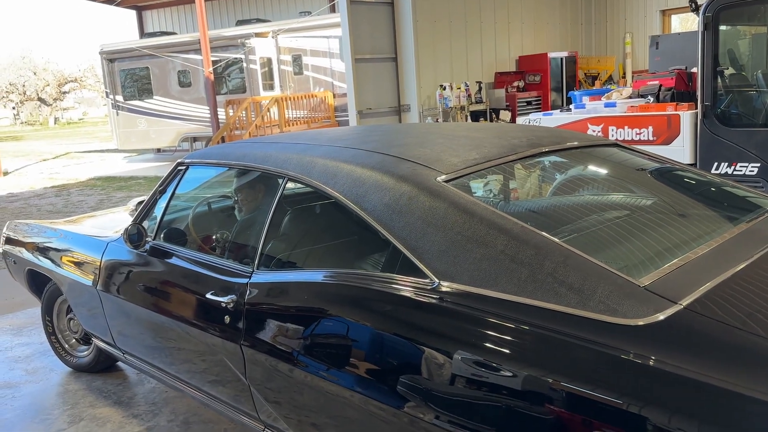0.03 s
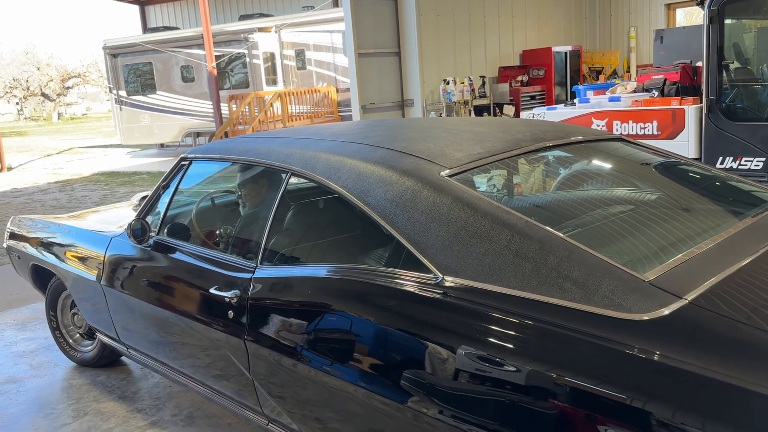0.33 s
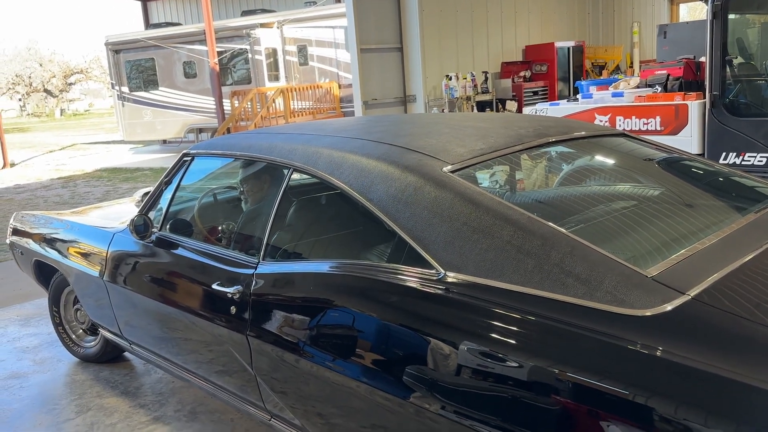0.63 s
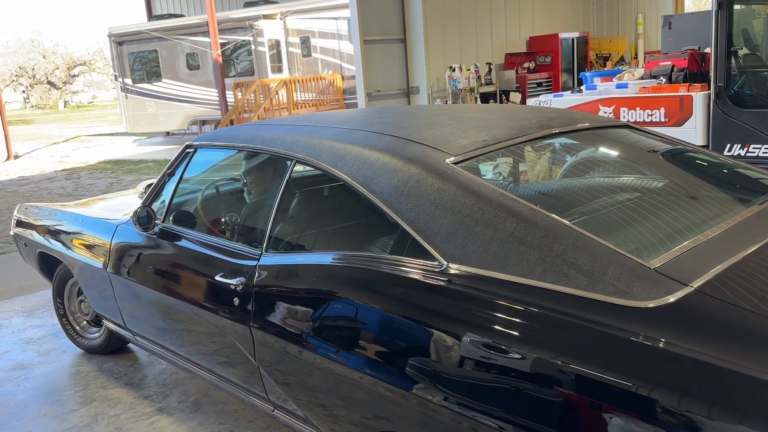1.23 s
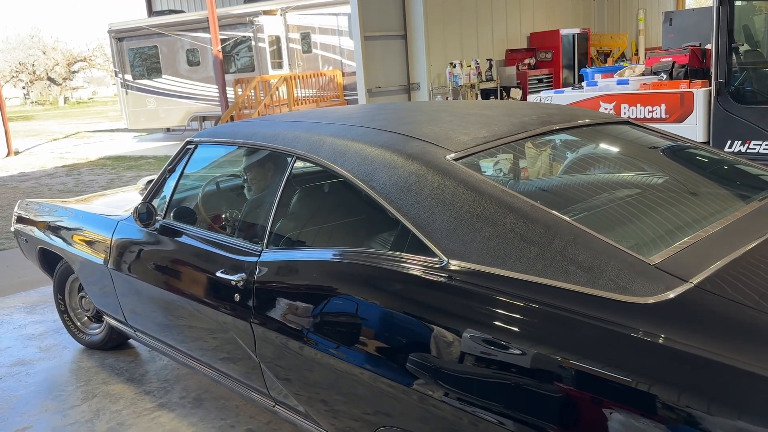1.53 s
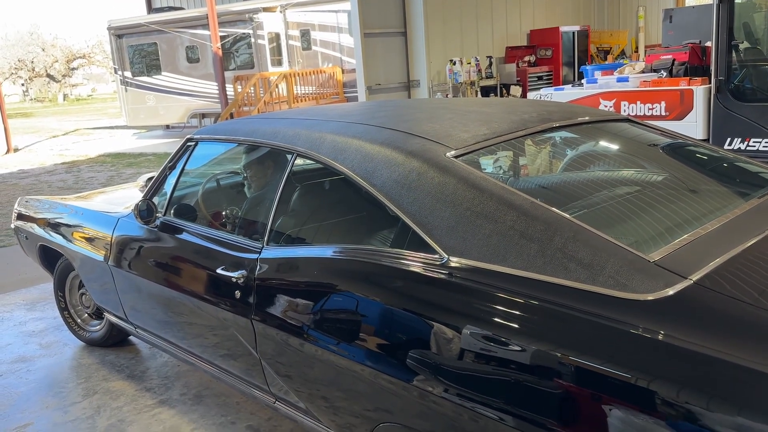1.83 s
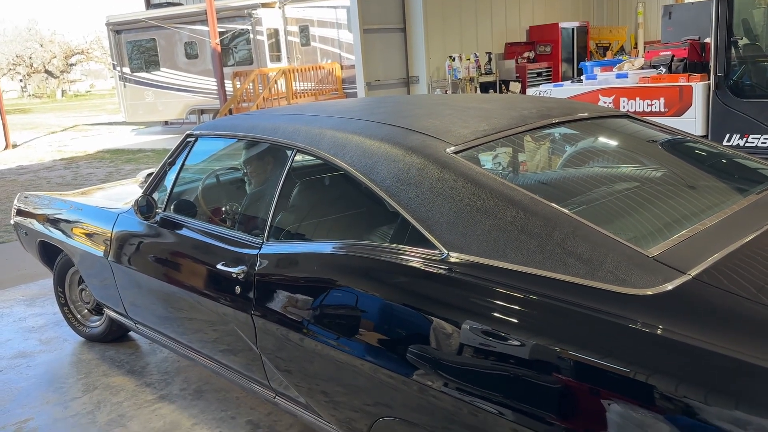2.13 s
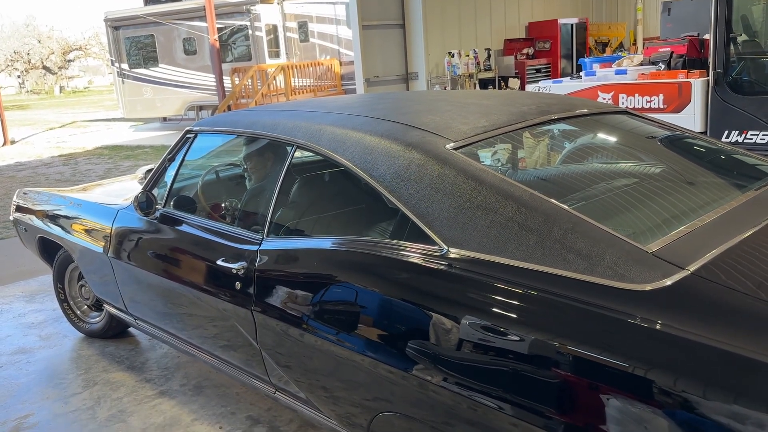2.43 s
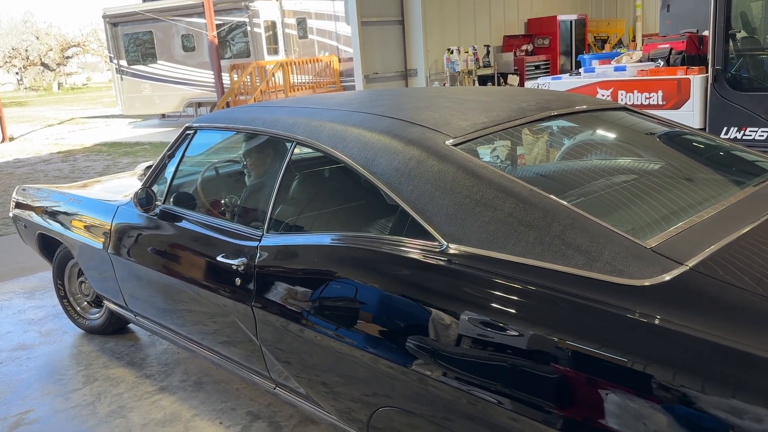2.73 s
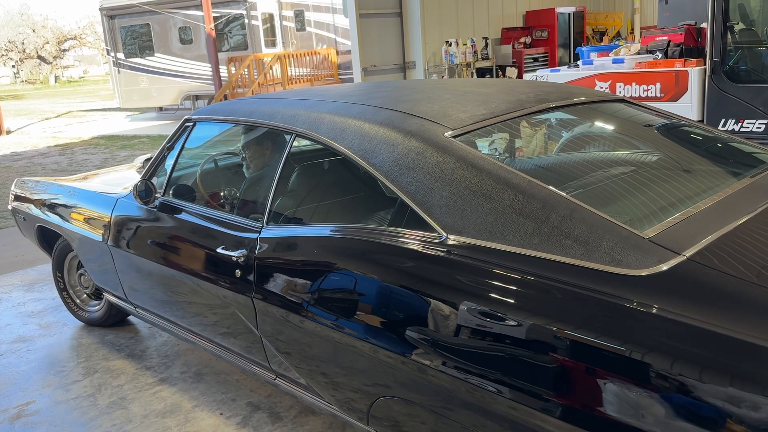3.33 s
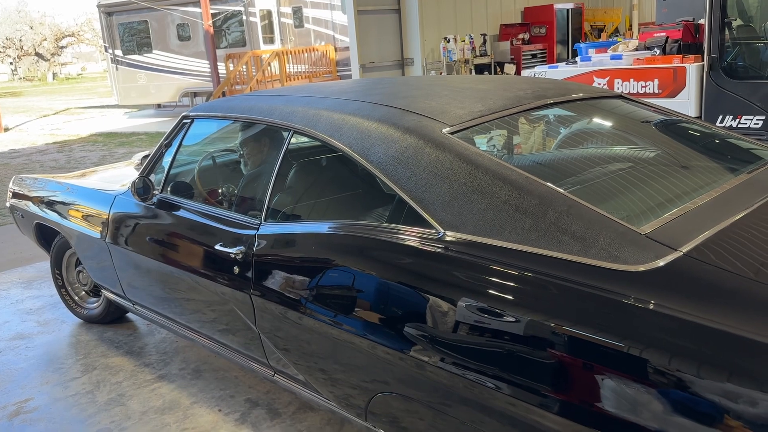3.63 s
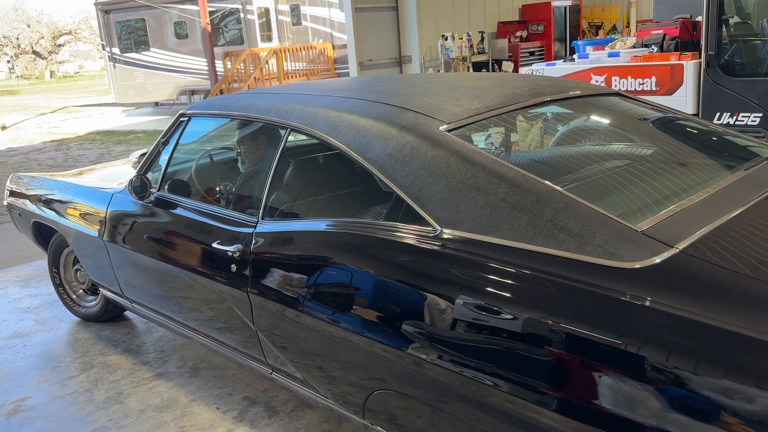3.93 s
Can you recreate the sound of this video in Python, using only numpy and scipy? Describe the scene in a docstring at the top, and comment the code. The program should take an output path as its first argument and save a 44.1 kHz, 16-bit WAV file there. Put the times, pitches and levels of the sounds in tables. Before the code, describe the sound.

A car engine cold-starts nearby after a moment of quiet garage background. A short squeak and starter clack lead to a loud exhaust boom and a few spits, easing into a throbbing, ticking idle with short wall reflections.

```python
"""Cold start of a V8 in a garage

The starter clacks in; the engine catches, stumbles, booms and settles into a loping idle.
Each firing sends a pressure pulse down the exhaust of its cylinder bank and excites the pipe modes;
at idle, alternate cycles differ in strength, which makes the lope. Fan and intake rush in time with
the firings, one bank ticks sharply, and the walls reflect the sound."""
import sys
import numpy as np
from scipy import signal
from scipy.io import wavfile

SR = 44100
rng = np.random.default_rng(int(sys.argv[2]) if len(sys.argv) > 2 else 0)


def pcm_store(signal):
    """Save signal as 16-bit PCM."""
    levels = np.round(np.clip(np.atleast_2d(signal), -1, 1) * 32767)
    wavfile.write(sys.argv[1], SR, levels.astype(np.int16).T)


N = 176400
TIME = np.arange(N) / SR
SIDES = np.array([[1], [-1]])  # sign of the left and right channel


def amp(db):
    """Amplitude ratio of a level in decibels."""
    return 10 ** (np.asarray(db) / 20)


def curve(rows, t=TIME):
    """Linear interpolation between breakpoints in time."""
    return np.interp(t, *np.transpose(rows))


def at_hz(rows, hz):
    """Interpolation of a spectrum on a logarithmic frequency axis."""
    f, value = np.transpose(rows)
    return np.interp(np.log(hz), np.log(f), value)


def resonate(x, hz, width):
    """Damped resonator with unit peak gain and a bandwidth in Hz."""
    r = np.exp(-np.pi * width / SR)
    feedback = [1, -2 * r * np.cos(2 * np.pi * hz / SR), r * r]
    return signal.lfilter(np.array([1, 0, -1]) * (1 - r * r) / 2, feedback, x + 1e-18)


def butterworth(x, hz, kind="low", order=2):
    """Filter with a maximally flat passband."""
    return signal.sosfilt(signal.butter(order, hz, kind, fs=SR, output="sos"), x)


def impulses(times, gain):
    """Weighted impulse train."""
    return np.bincount((times * SR).astype(int), gain, N)[:N]


def bursts(times, gain, decay_s):
    """Exponential relaxation: an envelope that jumps at each time and dies away."""
    kicks = impulses(np.atleast_1d(times), np.atleast_1d(gain))
    return signal.lfilter([1], [1, -np.exp(-1 / (decay_s * SR))], kicks + 1e-18)


# Likeness of left and right: f/Hz, correlation (limited to 1 in use)
COHERENCE = [(60, 2.5), (250, 0.83), (500, .5), (1000, 0.1), (2000, 0.26), (4000, 0.42), (8000, 0.3),
             (14000, 0)]
# Left minus right: f/Hz, level/dB
BALANCE = [(250, 1), (1000, -1), (2000, -2.5), (4400, 4), (7500, 5.5), (14000, -2)]


def noise(spectrum, low_hz, high_hz):
    """Partially coherent stereo noise, summed in third-octave bands to unit rms."""
    out, white = 0, rng.standard_normal((2, 2, N))
    edges = 28 * 2 ** (np.arange(29) / 3)
    for k, band in enumerate(zip(edges, edges[1:])):
        hz = np.sqrt(np.prod(band))
        if low_hz < hz < high_hz:
            mid, side = butterworth(white[k % 2], band, "band")
            alike = np.clip(at_hz(COHERENCE, hz), -1, 1)
            gain = amp(at_hz(spectrum, hz) + SIDES * at_hz(BALANCE, hz) / 2)
            out = out + gain * (np.sqrt(1 + alike) * mid + np.sqrt(1 - alike) * side * SIDES)
    return out / np.std(out)


# Background of the garage: f/Hz, level/dB
AMBIENT_SPECTRUM = [(30, -5.5), (75, -2.5), (150, -1.5), (260, -7.5), (370, 2.5), (530, -13.5), (830, 3.5),
                    (1250, -10.5), (1900, -9.5), (2700, -22.5), (3800, -17), (5500, -33), (6800, -20),
                    (9000, -37.5), (14000, -37.5)]


def ambience():
    """Broadband ambient noise; its level wanders slowly and drops as the engine catches."""
    drift_db = 1.5 * np.interp(TIME, np.linspace(0, TIME[-1], 120), rng.standard_normal(120))
    drop_db = curve([(0.85, 0.0084), (1.1, -6)])
    return amp(-35 + drift_db + drop_db) * noise(AMBIENT_SPECTRUM, 25, 15000)


# Floor, car body and walls: left delay/s, right delay/s, level/dB
SURFACES = [(.0029, 0.0029, -11.5), (.0093, 0.0089, -10.5), (0.0162, .0158, -14.5), (0.0264, 0.019, -13)]


def early_reflections(x):
    """Comb filtering: delayed copies interfere with the direct sound; total power is preserved."""
    out = x.copy()
    for *delays, db in SURFACES:
        delayed = [np.interp(TIME - lag, TIME, side, left=0) for lag, side in zip(delays, x)]
        out += amp(db) * np.array(delayed)
    return out * np.std(x) / np.std(out)


def reverberation(x, t60_s=0.11):
    """Diffuse field of the garage: an exponential decay, different at each ear."""
    t = TIME[:SR // 2]
    tail = rng.standard_normal((2, len(t))) * amp(-60 * t / t60_s)
    tail /= np.sqrt(np.sum(tail ** 2) / 2)
    return signal.fftconvolve(np.atleast_2d(x), tail, axes=1)[:, :N]


# A squeak, the starter's clack, the rasp of its gear: t/s, f/Hz, bandwidth/Hz, level/dB, decay/s
STARTER_RUBS = [(0.724, 1220, 24.93, -10, 0.017), (0.818, 1370, 610, -16.5, 0.013),
                (0.966, 6980, 216, -5.5, 0.0088), (1.011, 6840, 400, -21, 0.041)]


def starter():
    """Frictional excitation: each brief rub rings one resonance."""
    return sum(resonate(bursts(t, amp(db), decay_s) * rng.standard_normal(N), hz, width)
               for t, hz, width, db, decay_s in STARTER_RUBS)


# Rush of fan and intake, and hiss of the engine bay: t/s, level/dB
RUSH_LEVEL = [(.76, -51), (.82, -32.5), (.93, -54.5), (1.04, -35.5), (1.16, -31.5), (1.28, -35.5),
              (1.36, -37), (1.5, -35.5), (2.2, -38), (4, -40)]
HISS_LEVEL = [(.76, -73), (.79, -36), (.94, -31), (1.04, -31.5), (1.18, -29.5), (1.29, -33), (1.36, -40),
              (1.52, -31), (1.67, -35.5), (1.88, -32.5), (2.3, -35.5), (4, -38.5)]
# Their spectra: f/Hz, level/dB
RUSH_SPECTRUM = [(350, 0.5), (600, -3), (1000, -2.5), (1200, -2), (1450, -5), (2000, -9.5), (2700, -12.5),
                 (3400, -31)]
HISS_SPECTRUM = [(1760, -39), (3000, -10), (3470, -15), (4590, -3.5), (5490, -8.5), (7030, -5.5),
                 (8640, -5.5), (9450, 3.5), (11500, -36.5), (12300, -25), (12900, -8.5), (14400, -12),
                 (15500, -18)]


def fan_and_intake(times, accent_db, throb_db=2.5):
    """Flow noise, amplitude-modulated by the firings."""
    pulsation = bursts(times, amp(accent_db), decay_s=0.029)
    throb = amp(throb_db * (pulsation - pulsation.mean()) / pulsation.std())
    rush = amp(curve(RUSH_LEVEL)) * noise(RUSH_SPECTRUM, 350, 3400)
    hiss = amp(curve(HISS_LEVEL)) * noise(HISS_SPECTRUM, 2900, 17000)
    return throb * (rush + hiss)


# Starter clunk and the sharpest spits of the cold engine: t/s, level/dB, decay/s
SPIT_EVENTS = [(0.781, -29, 0.0066), (0.817, -32.5, 0.0074), (0.88, -26, 0.006), (0.969, -23, 0.011),
               (1, -26.5, 0.017), (1.055, -22, 0.0064), (1.118, -23.5, 0.0039), (1.149, -26.5, 0.015),
               (1.256, -27, 0.0057), (1.434, -22, 0.0052), (1.493, -25.5, 0.0045), (1.584, -26, .005),
               (1.712, -23, 0.0034), (1.909, -24, 0.005), (2.029, -23.5, 0.0033), (3.172, -26.5, 0.0044)]
# Their spectrum: f/Hz, level/dB
SPIT_SPECTRUM = [(300, -3), (1500, -9), (3000, -12), (4600, -5), (5800, -7.5), (7000, -3.5), (8600, 1),
                 (15000, -12)]


def clunk_and_spits():
    """Broadband transients: noise with an abrupt onset and an exponential decay."""
    envelope = sum(bursts(t, amp(db), decay_s) for t, db, decay_s in SPIT_EVENTS)
    return envelope * noise(SPIT_SPECTRUM, 300, 16000)


# Firing rate of the engine: t/s, f/Hz
FIRING_RATE = [(0.75, 29.38), (0.9, 16.95), (1.05, 43.83), (1.2, 63.08), (1.4, 50.94), (1.5, 52.14),
               (1.75, 47.91), (2.0, 53.72), (2.4, 55.87), (2.8, 55.27), (3.05, 58.3), (3.4, 55.27),
               (4.0, 57.11)]
# Cylinders in firing order: pipe delay/s, then level/dB while warming, on even and on odd idle cycles
CYLINDER_PULSES = [(0.0031, 0.7, 0.1, -1.9), (0.0127, -3.5, 0.77, -0.5), (0.01258, -4, -0.4, -6),
                   (0.00301, 0.8, -0.2, 0.25), (0.01244, -3.5, -5, 0.5), (0.0031, -0.7, 0.5, -1),
                   (0.003, -0.3, -7.5, 2), (0.01149, -4.5, 0.9, 0.1)]


def firings(lope_from_s=1.9, lope_fade_s=0.28):
    """Time, cylinder and accent of each firing; period doubling at idle makes the lope."""
    count = np.cumsum(curve(FIRING_RATE) * (TIME >= FIRING_RATE[0][0])) / SR
    n = np.arange(3, int(count[-1]) + 1)
    times = np.interp(n, count, TIME)
    cycle, cylinder = np.divmod(n, 8)
    pulses = np.array(CYLINDER_PULSES)
    surge_db = 0.5 * np.cos(np.pi * (n - 1.3) / 8)  # one swell every two cycles
    idle_db = pulses[cylinder, 2 + cycle % 2] + surge_db
    lope = np.clip((times - lope_from_s) / lope_fade_s, 0, 1)
    return times, cylinder, (1 - lope) * pulses[cylinder, 1] + lope * idle_db


# Exhaust resonances: f/Hz, bandwidth/Hz, level/dB in bank 0, level/dB in bank 1
PIPE_MODES = [(62.37, 28.84, 20.5, 5.5), (64.74, 26.15, 22.0, -5.5), (97.6, 5.57, 15, 3),
              (145.5, 19.4, 4.5, 11.5), (165.4, 24.8, 1.93, 2.36), (218.5, 27, -11, -6),
              (263.8, 10.7, -14, -29), (312.6, 8.5, -12.5, -11), (388.4, 9.1, -14.5, -26)]
# Spectral slope of the pulses, dull while cranking: t/s, slope/(dB per octave)
PULSE_SLOPE = [(0.9, -16.5), (1.06, 0.1), (1.2, -3.5), (1.55, -2), (1.68, -2), (2.3, -2.9)]
# Cylinders in firing order: bank (0 or 1)
CYLINDER_BANK = [0, 1, 1, 0, 1, 0, 0, 1]


def pipe_thumps(times, arrivals, cylinder, level_db, accent_db):
    """Modal superposition: pulses ring the pipes, accented firings more brightly than weak ones."""
    bank = np.array(CYLINDER_BANK)[cylinder]
    slope = curve(PULSE_SLOPE, times) + 1.21 * accent_db
    thump, drive_db, pivot_hz = 0, 51, 92.6
    for k, (hz, width, *bank_db) in enumerate(PIPE_MODES):
        gain = amp(drive_db + level_db + np.array(bank_db)[bank] + slope * np.log2(hz / pivot_hz))
        mode = resonate(impulses(arrivals, gain), hz, width)
        mode = butterworth(mode, 2.47 * hz)  # soften the upper skirt
        thump = thump + (-1) ** k * mode
    thump = butterworth(thump, 34, "high")
    return thump + amp(-17.5) * reverberation(thump)[0] * SIDES


# Exhaust overtones: f/Hz, bandwidth/Hz, level/dB
PUFF_MODES = [(230.8, 18.6, -10.5), (256.3, 9, -13.5), (311.7, 5.7, -12), (381.2, 5, -22),
              (491.6, 9, -19.5), (537.4, 5, -26)]
# Extra roughness of the puffs while the engine catches: t/s, level/dB
PUFF_ROUGHNESS = [(.9, 9), (1.03, 3), (1.25, 0), (1.4, 2.5), (2.2, 2.5)]


def gas_puffs(arrivals, level_db):
    """Turbulent excitation: a puff of gas at each pulse rings the overtones of the pipes."""
    envelope = amp(curve(PUFF_ROUGHNESS) - 2.5) * bursts(arrivals, amp(level_db), decay_s=0.029)
    gas = envelope * noise([(200, 0), (600, 0.0025)], 170, 700)
    return sum(amp(db) * resonate(gas, hz, width) for hz, width, db in PUFF_MODES)


# Strength of combustion: t/s, level/dB
COMBUSTION = [(0.87, -24), (0.96, -19), (1.04, -14), (1.11, -12), (1.22, -13.5), (1.29, -14), (1.35, -18),
              (1.43, -9.5), (1.55, -12), (1.67, -16.5), (1.8, -11.5), (1.92, -11.5), (2.2, -13.5),
              (4.0, -14.5)]


def exhaust(times, cylinder, accent_db, spread_db=0.98, pan_db=0.08):
    """Propagation delay: each firing travels down its pipe and arrives as a thump and a puff."""
    arrivals = times + np.array(CYLINDER_PULSES)[cylinder, 0]
    level_db = accent_db + curve(COMBUSTION, times) + spread_db * rng.standard_normal(len(times))
    thumps = pipe_thumps(times, arrivals, cylinder, level_db, accent_db)
    return (thumps + gas_puffs(arrivals, level_db)) * amp(pan_db * SIDES)


# Hard first firings: t/s, level/dB
BARK_EVENTS = [(0.999, -12.5), (1.030, -13.5), (1.056, -9), (1.079, -8.5), (1.113, -19), (1.154, -13.5),
               (1.191, -13), (1.25, -19)]
# Their spectrum: f/Hz, level/dB
BARK_SPECTRUM = [(90, 10), (170, 5.5), (260, -3), (370, 2), (480, -23)]


def barks():
    """Low-frequency transients: the first hard firings blast through the pipes as decaying noise."""
    times, db = np.transpose(BARK_EVENTS)
    blast = bursts(times, amp(db), decay_s=0.011) * noise(BARK_SPECTRUM, 80, 520)
    return butterworth(blast, 550, order=4)


# Tick of each cylinder in firing order: level/dB
TICK_LEVELS = [-1, -19.5, -24.5, 3, -15.5, 1, -9, -25]
# Ring of the ticks: f/Hz, bandwidth/Hz, level/dB
TICK_RESONANCES = [(4627, 100, -16), (7060, 190, -22), (9090, 590, -26.5), (6740, 6200, -42)]


def ticks(times, cylinder, from_s=1.0, delay_s=0.006, spread_db=1, pan_db=1):
    """Damped ringing: a short noise burst after each firing excites high modes, never quite alike."""
    out = 0
    for hz, width, db in TICK_RESONANCES:
        level_db = db + np.array(TICK_LEVELS)[cylinder] + spread_db * rng.standard_normal(len(times))
        envelope = bursts(times + delay_s, amp(level_db) * (times > from_s), decay_s=0.0024)
        out = out + resonate(envelope * rng.standard_normal(N), hz, width)
    return out * amp(7.5 + pan_db * SIDES)


def scene():
    """Superposition of the engine's sources, the background and their reflections in the garage."""
    times, cylinder, accent_db = firings()
    rush = fan_and_intake(times, accent_db)
    transients = ticks(times, cylinder) + clunk_and_spits() + starter()
    airborne = early_reflections(rush + ambience())
    pipes = exhaust(times, cylinder, accent_db) + barks()
    return pipes + airborne + transients + amp(2) * reverberation(transients)


def record(dry, notch_hz=11280, notch_width_hz=4140, cutoff_hz=15900):
    """Band limiting and saturation: a treble notch, rounded peaks and a steep top cut."""
    notched = butterworth(dry, [notch_hz - notch_width_hz / 2, notch_hz + notch_width_hz / 2], "stop")
    rounded = notched / (1 + notched ** 8) ** (1 / 8)
    return signal.sosfilt(signal.ellip(10, 0.2, 80, cutoff_hz, fs=SR, output="sos"), rounded)


dry = scene()
out = record(dry)
pcm_store(out)
```